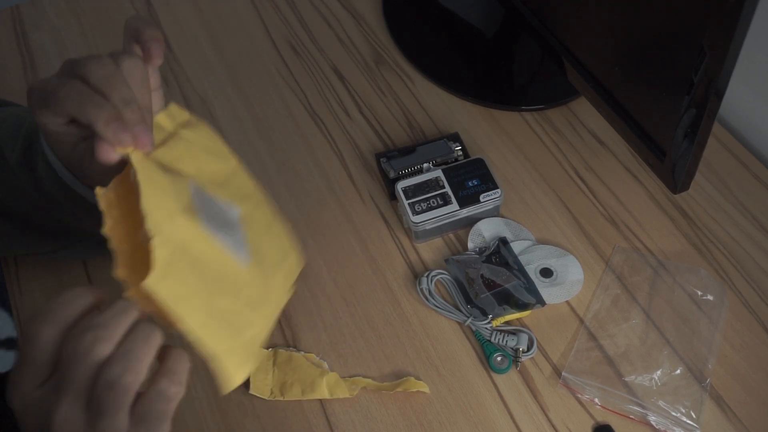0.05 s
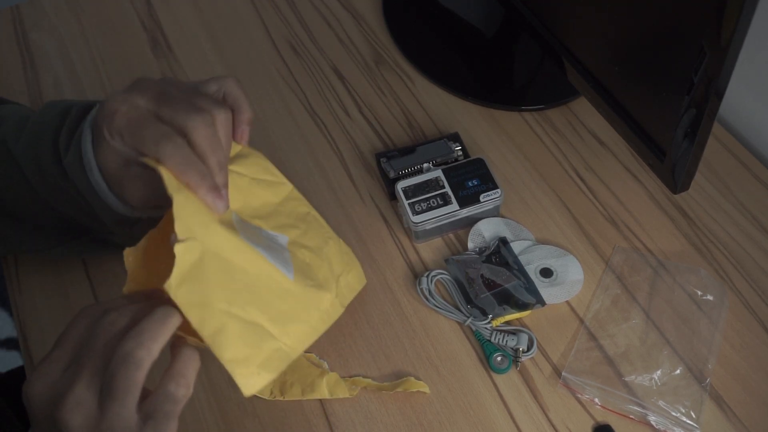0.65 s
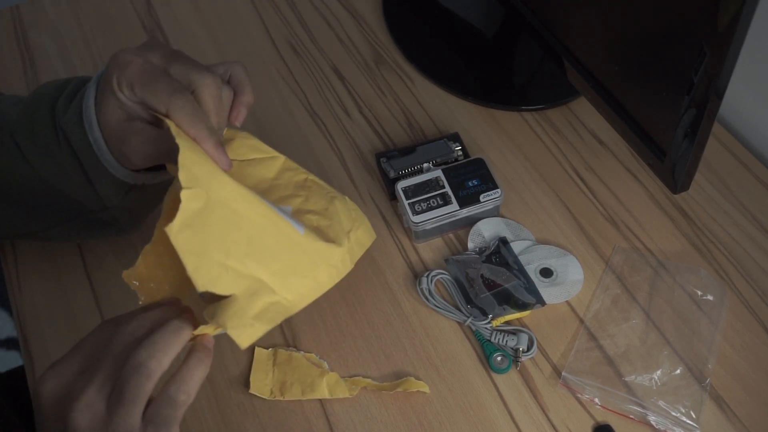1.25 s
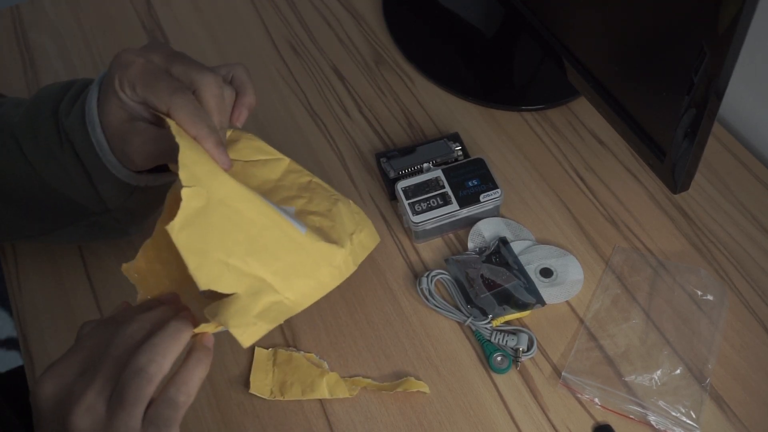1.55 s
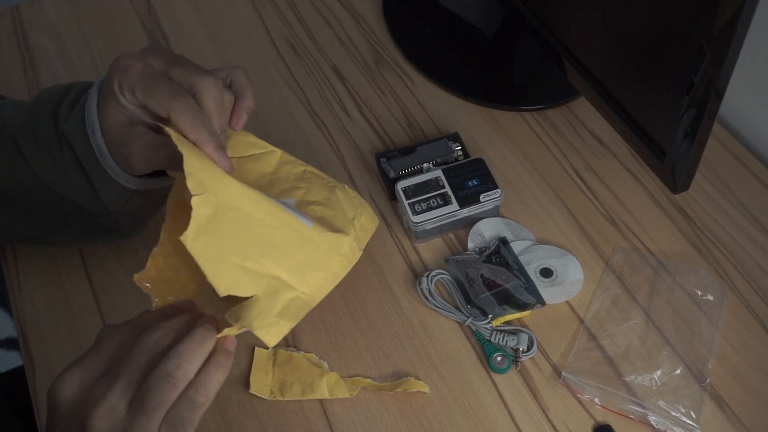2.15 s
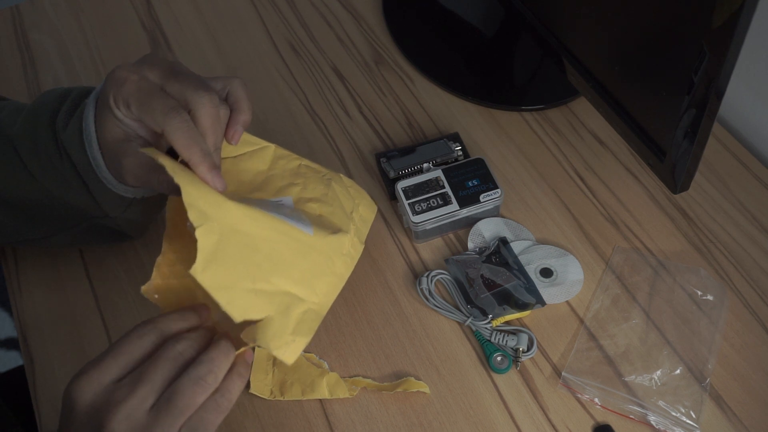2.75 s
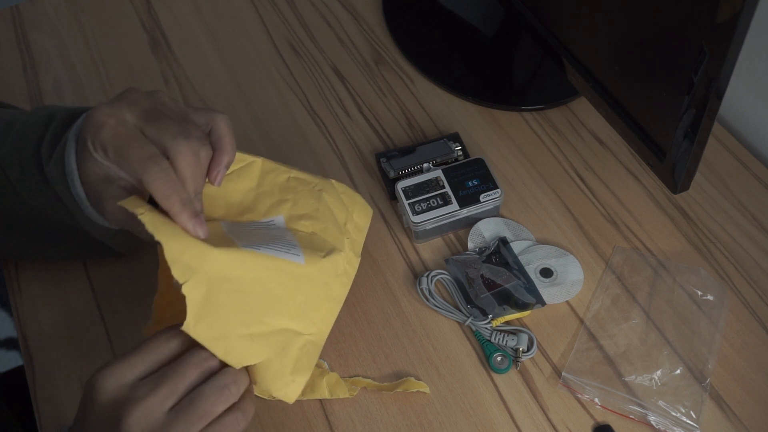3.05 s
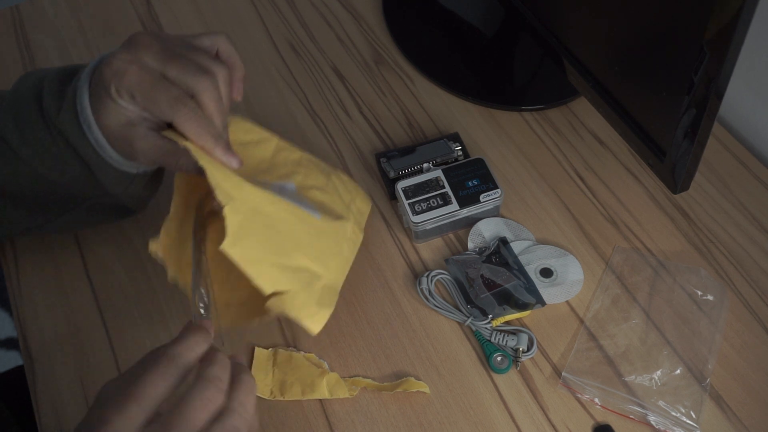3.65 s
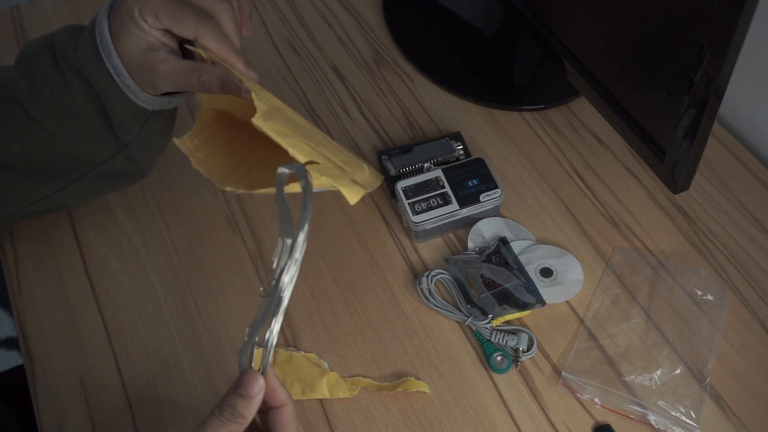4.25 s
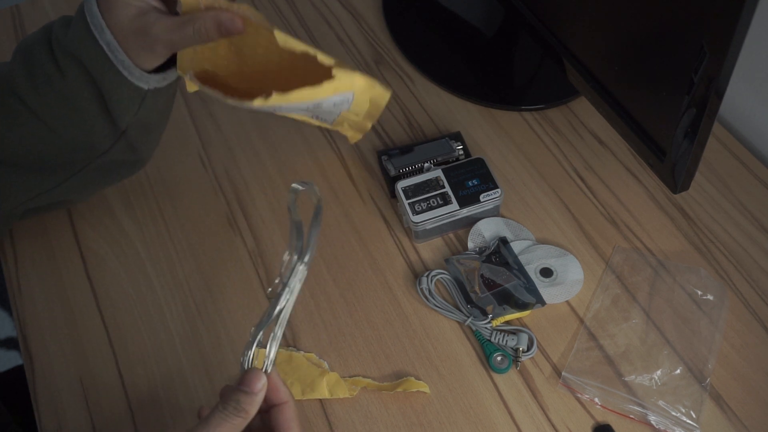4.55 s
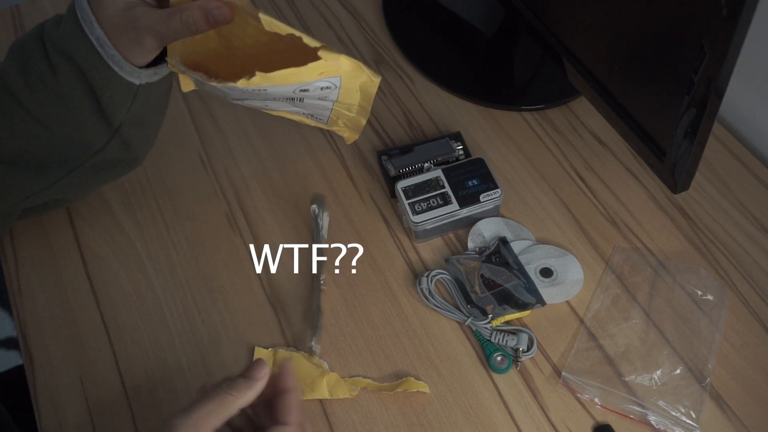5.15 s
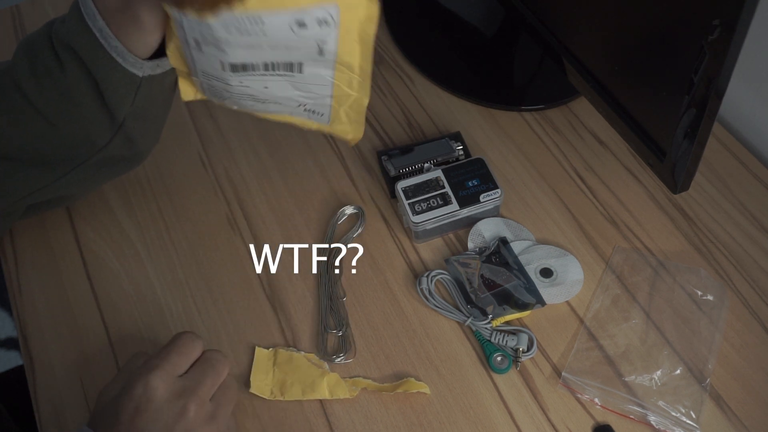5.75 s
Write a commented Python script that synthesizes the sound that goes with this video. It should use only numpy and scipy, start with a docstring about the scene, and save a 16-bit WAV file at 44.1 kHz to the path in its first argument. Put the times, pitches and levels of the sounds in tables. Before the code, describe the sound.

A padded paper mailer crinkles and rips open, then a cable slides out and clatters onto a wooden desk.

```python
"""First you hear paper rubbing and crinkling as hands grip a padded mailer, then a loud rip.
The paper catches and slips in tiny clicks, its creases buckle, and its fibres snap as it tears.
Hands bump the wooden desk, a coiled cable slides out and is dropped with a clatter of plugs,
and the mailer is turned over. A bare room adds a short echo and a faint hiss."""
import sys
import numpy as np
from scipy import signal
from scipy.fft import rfft, irfft
from scipy.io import wavfile
from scipy.ndimage import uniform_filter1d

SR = 44100
rng = np.random.default_rng(int(sys.argv[2]) if len(sys.argv) > 2 else 0)


def store_pcm(level_fs):
    """Save levels as 16-bit WAV."""
    pcm = np.round(np.clip(level_fs, -1, 1) * 32767).astype(np.int16)
    wavfile.write(sys.argv[1], SR, np.atleast_2d(pcm).T)


N = 260631

# Finger rubs. Each row: start and length in seconds, body (middle pitches) and fizz (treble) in dB,
# pitch of the mailer's hollow in Hz, its ring in dB. Levels in all tables are relative.
RUBS = [(0.0, 0.098, -43, -50.5, 1560, 0), (.13, .07, -52, -42, 1650, 3),
        (0.21, 0.047, -44.5, -41.5, 1790, 8.5), (.38, .035, -40, -38.5, 1700, 9),
        (.44, .06, -43, -42.5, 1810, 2), (0.54, .29, -42, -40, 1500, -3.5),
        (1.122, 0.11, -43, -45.5, 1220, 4), (1.35, .1, -83, -57.5, 1260, 4),
        (2.721, 0.12, -56.5, -57, 1050, 9.5), (2.914, .03, -52.5, -58, 1180, 6),
        (2.976, .02, -47.5, -41.5, 800, 11), (3.04, .05, -52.5, -49, 1850, -6.5),
        (3.17, .24, -53, -52.5, 1400, -24), (4.225, .03, -65, -60.5, 1410, -3),
        (4.35, .04, -56, -50, 1430, 4.5), (4.52, .1, -64.5, -62, 1800, 9.5),
        (5.771, 0.072, -54.5, -44, 1850, 6.5), (5.885, .04, -44, -38, 1730, 0.5)]
# The cable dragged out through the torn end. Each row: time in seconds, body in dB, fizz in dB.
SLIDE = [(3.42, -51, -43), (3.439, -34.5, -37), (3.48, -49, -41), (3.56, -44.5, -42.5), (3.63, -39, -38.5),
         (3.72, -45.5, -46), (3.78, -43, -54.5), (3.981, -56, -51)]
# Big creases buckling. Each row: start in seconds, level in dB, brightness in dB per octave,
# pitch in Hz of the paper panel that flips.
CRINKLES = [(0.1368, -38, -9, 3770), (0.2172, -31, -3, 1630), (0.2244, -30.5, -2.5, 1640),
            (0.3784, -32, 5, 1490), (0.458, -33, 0.5, 1780), (0.5508, -35.5, -8, 3460),
            (0.6038, -31.5, 3.5, 1630), (0.6476, -33, 20, 7040), (0.7172, -37, 1, 1320),
            (1.0996, -34, 6, 1540), (1.2185, -26.5, 5, 1200), (1.2542, -35.5, 4.5, 1160),
            (1.4272, -48, 9, 6160), (1.5396, -52, 5, 2830), (2.3966, -52, 2, 3330),
            (2.6194, -51.5, 4.5, 5050), (2.6636, -41.5, 0.5, 1390), (2.739, -45, 0.5, 1160),
            (2.8288, -47, 14, 4580), (2.8582, -47, 9, 6190), (2.9694, -35.5, -0.5, 1900),
            (3.0528, -44, 15, 6700), (3.2064, -46.5, 3, 4570), (3.433, -31.5, -2, 4200),
            (3.5754, -26.5, -2.5, 1340), (3.6358, -30, 6, 1290), (3.6666, -32, 7.5, 2550),
            (3.7222, -31, 3, 1460), (4.371, -42, 3.5, 1470), (4.4414, -46, 1.5, 1600),
            (5.728, -35.5, 15, 6990), (5.848, -36, 1, 1740), (5.8924, -34, 0.5, 1780)]
# The long rip. Each row: time in seconds, body in dB, fizz in dB.
RIP = [(.82, -47, -38.5), (.845, -32, -27), (.88, -30, -31), (.92, -20, -25.5), (.955, -28, -43),
       (.98, -35, -40.5), (1.005, -25, -39), (1.03, -54, -42), (1.11, -58.5, -54)]
# Fibre bundles breaking. Each row: start in seconds, level in dB, brightness in dB per octave.
CRACKS = [(0.8535, -16, -7.5), (0.8696, -21, -0.5), (0.8768, -18, 4), (0.8787, -19.5, -9.5),
          (0.8918, -14.5, 2), (0.8965, -14, -1), (0.9091, -21, 8), (0.9291, -20, -2), (0.9331, -20, 0),
          (0.9434, -25, 7), (0.952, -19, -1)]
# Cable and plugs hitting the desk and each other.
# Each row: start in seconds, level in dB, brightness in dB per octave.
CLACKS = [(4.065, -54, -1), (5.0142, -23.5, 0), (5.0955, -33, 2), (5.1035, -24.5, 2), (5.2245, -30.5, 1),
          (5.2575, -21.5, 3.5), (5.2675, -23, 5), (5.272, -16.5, 3), (5.3091, -26, -1),
          (5.3281, -25.5, 2.5)]
# How the plugs ring. Each row: pitch in Hz, width in Hz, level in dB.
PLUG_TONES = [(1210, 120, 0), (2070, 56, -9), (3310, 270, 6), (3950, 280, 9), (4440, 250, 6.5),
              (6160, 350, 0), (15300, 990, -2.5)]
# Soft blows on the desk. Each row: start in seconds, level in dB, contact time in seconds.
BUMPS = [(1.81, -41, 0.0059), (1.955, -40.5, 0.0069), (3.773, -29.5, 0.004), (3.784, -23, 0.0027),
         (3.801, -36, 0.0025), (3.839, -42, 0.0019), (5.0143, -51, 0.0012), (5.1841, -24.5, 0.00023),
         (5.222, -30.5, 0.0018), (5.271, -30.5, 0.003), (5.448, -30, 0.0062), (5.467, -44, 0.0043)]
# How the desk rings. Each row: pitch in Hz, level in dB, seconds to fade by 60 dB.
DESK_TONES = [(107, -15, 0.033), (130, -1, 0.14), (160, -7, 0.14), (180.7, -2, 0.14), (228, -8, 0.1),
              (281, 0.5, 0.06), (364, 3, 0.059), (457, -7, 0.14), (660, -13.5, 0.045)]
# Squeezes of the padding. Each row: start in seconds, length in seconds, level in dB.
SQUEEZES = [(0.346, 0.065, -56), (0.515, .14, -47.5), (0.667, 0.08, -43.5), (0.834, 0.16, -44.5),
            (1.328, .11, -49.5), (1.988, 0.15, -57), (2.707, 0.12, -51), (3.45, 0.45, -62)]
# The tone colour of each source. Each row: frequency in Hz, level in dB.
RUB_COLOUR = [(150, -23.5), (400, -12), (560, -7), (720, -4.5), (950, -7), (1400, 0), (2000, -1.5),
              (2500, -2.5), (3600, -0.5), (5200, -7.5), (6200, -5), (7200, -9), (12500, -2), (16000, -7)]
RIP_COLOUR = [(100, -30), (220, -18.5), (340, -24), (470, -12.5), (600, -15.5), (790, -7), (950, -10.5),
              (1400, -2), (1950, -6), (2480, -16), (3700, -12.5), (7000, -27.5), (12500, -22.5),
              (16000, -25.5)]
CABLE_COLOUR = [(200, 5), (450, 0.5), (900, -4), (1300, 0.5), (1650, 0), (2050, 2), (2500, -3),
                (3300, -1.5), (4300, -7), (5500, -7.5), (7500, -10.5), (12000, -5), (14700, 1.5),
                (16000, -8)]
PADDING_COLOUR = [(40, -16), (75, 1.5), (115, 3.5), (190, 3), (250, -7.5), (330, -4), (480, -12),
                  (800, -16.5), (2000, -68.5)]
HISS_COLOUR = [(12, -51), (20, -2.5), (81, -4.5), (110, -6.5), (472, -13.5), (642, -9.5), (738, -15),
               (897, -16), (1480, -17), (1760, -21), (3340, -22.5), (3630, -23.5), (3950, -22),
               (14700, -25.5), (16000, -29)]
# The room's echo. Each row: frequency in Hz, seconds to fade by 60 dB, level in dB.
ROOM_ECHO = [(100, 0.48, -2), (303, 0.54, 0.5), (800, 0.58, 2), (1560, 0.52, -0.5), (4000, 0.46, -1.5),
             (8600, 0.31, -0.5), (15000, .33, -11.5)]
# How wide echo and hiss sound. Each row: frequency in Hz, side against mid in dB (see widen).
ECHO_WIDTH = [(100, -37.5), (250, -18), (700, -7.5), (1300, -6), (2400, 0), (4400, 2), (8000, 4),
              (15000, 5)]
HISS_WIDTH = [(60, -14), (110, -9.5), (200, -1.5), (380, 2), (700, 2), (1290, 5), (2380, 3), (4400, 1),
              (8120, 0), (15000, 0.5)]

TIME = np.arange(N) / SR


def rubbing():
    """Sliding paper slips in tiny clicks that ring the mailer's hollow; creases buckle now and then."""
    strokes = [rub_levels(*row[:4]) for row in RUBS] + [SLIDE]
    hz, ring_db = hollow()
    clicks = slips(per_s=6000, spread_db=4)
    clicks = clicks + gain_of(ring_db) * resonate(clicks, hz, width_hz=320)
    slide = paper_stroke(clicks, strokes, RUB_COLOUR, patchy_db=3)
    buckles = CRINKLES + small_creases(strokes)
    creases = snaps(buckles, RUB_COLOUR, length_s=0.0036, spread_db=2, panel_db=17.5)
    return gain_of(-3.5) * slide + gain_of(-2.5) * creases


def rub_levels(start_s, length_s, body_db, fizz_db, swell_s=0.077, release_s=0.039):
    """One rub swells, sags a little and lets go. Gives rows like SLIDE."""
    end_s = start_s + length_s
    shape = [(start_s - swell_s, -20.5), (start_s, 0), (end_s, -0.5), (end_s + release_s, -20.5)]
    return [(s, body_db + db, fizz_db + db) for s, db in shape]


def hollow(slide_hz=1060, rise_hz_per_s=900, slide_ring_db=-3, wander_share=0.088, wander_s=0.05):
    """Each grip gives the mailer's hollow a new pitch and ring; the pitch rises as the cable leaves."""
    grips = [(start_s + length_s / 2, hz, ring_db) for start_s, length_s, _, _, hz, ring_db in RUBS]
    grips += [(s, slide_hz + rise_hz_per_s * (s - SLIDE[0][0]), slide_ring_db) for s, _, _ in SLIDE]
    s, hz, ring_db = np.transpose(sorted(grips))
    wander = np.interp(TIME / wander_s, np.arange(N), rng.uniform(-1, 1, N))  # the paper keeps flexing
    return np.interp(TIME, s, hz) * (1 + wander_share * wander), np.interp(TIME, s, ring_db)


def small_creases(strokes, held_s=5.6, per_s=20, still_db=-58.5, low_hz=1300, high_hz=6500):
    """Little creases tick at random in the gripped paper, louder during rubs. Gives CRINKLES rows."""
    when, size, panel = rng.random((round(held_s * per_s), 3)).T
    s = when * held_s
    fizz_db = level_curve(strokes, s, column=2)
    db = np.maximum(fizz_db + 1.5, still_db) + 4 * (2 * size - 1)
    brightness = np.full(len(s), 5)
    return list(zip(s, db, brightness, low_hz * (high_hz / low_hz) ** panel))


def ripping():
    """Fibres part in a coarse run, with loud cracks where whole bundles give way."""
    run = paper_stroke(slips(per_s=2200, spread_db=-1), [RIP], RIP_COLOUR, patchy_db=2)
    cracks = snaps(CRACKS, RIP_COLOUR, length_s=0.0041, spread_db=3)
    return gain_of(-3.5) * (run + cracks)


def slips(per_s, spread_db):
    """Surfaces catch and let go, making tiny clicks of random size at random times."""
    size = gain_of(spread_db * np.minimum(rng.exponential(1, N), 4))
    return unit_level(size * rng.choice([-1, 1], N) * (rng.random(N) < per_s / SR))


def paper_stroke(clicks, strokes, colour, patchy_db):
    """Clicks shake the sheet. Body and fizz follow the strokes; the tone shifts as the paper flexes."""
    hz, t, bands = signal.stft(unit_level(coloured(clicks, colour)), SR, nperseg=256)
    patches = uniform_filter1d(rng.standard_normal(bands.shape), size=6, axis=0)
    patches = uniform_filter1d(patches, size=8, axis=1)
    bands = bands * gain_of(patchy_db * unit_level(patches))
    power = (abs(bands) ** 2).mean(1)
    body, fizz = (hz > 800) & (hz < 2500), hz > 5000
    body_db = level_curve(strokes, t) - 10 * np.log10(power[body].sum() / power.sum())
    fizz_db = level_curve(strokes, t, column=2) - 10 * np.log10(power[fizz].sum() / power.sum())
    fizz_share = look_up([(2000, 0.18), (7000, 1.0)], hz)[:, None]
    bands = bands * gain_of((1 - fizz_share) * body_db + fizz_share * fizz_db)
    return signal.istft(bands, SR, nperseg=256)[1][:N]


def snaps(rows, colour, length_s, spread_db, panel_db=0, panel_sharpness=6.5):
    """Each snap is a burst of uneven clicks. If its row gives a pitch, a paper panel rings too."""
    out, t = np.zeros(N), TIME[:2048]
    for s, db, tilt_db, *panels in rows:
        clicks = rng.standard_normal(len(t)) * gain_of(spread_db * rng.standard_normal(len(t)))
        burst = coloured(clicks * np.exp(-(t / length_s) ** 2), colour, tilt_db)
        for hz in panels:
            burst = burst + gain_of(panel_db) * resonate(burst, hz, hz / panel_sharpness)
        burst *= np.sqrt(.005 * SR / np.sum(burst ** 2))  # as much energy as 5 ms at level 1
        add(out, s, gain_of(db) * burst)
    return out


def cable(rattle_s=0.021):
    """Hard clacks ring the plugs, and the loose coils rattle briefly after each one."""
    clacks = snaps(CLACKS, CABLE_COLOUR, length_s=0.0056, spread_db=2.5)
    clacks = clacks + sum(gain_of(db) * resonate(clacks, hz, width) for hz, width, db in PLUG_TONES)
    decay = np.exp(-1 / (rattle_s * SR))
    shake = np.sqrt(signal.lfilter([1 - decay], [1, -decay], clacks ** 2) + 1e-20)
    rattle = shake * unit_level(coloured(slips(per_s=1300, spread_db=-0.5), CABLE_COLOUR))
    return gain_of(-6.5) * clacks + gain_of(-11) * rattle


def desk(shove_s=0.0013):
    """A soft blow shoves the desk top and makes it ring; longer contact sounds duller."""
    out, t = np.zeros(N), TIME[:SR // 2]
    ring = sum(gain_of(db - 60 * t / fade) * np.sin(2 * np.pi * hz * t) for hz, db, fade in DESK_TONES)
    shove = (1 - t / shove_s) * np.exp(-t / shove_s)
    for s, db, contact_s in BUMPS:
        force = t * np.exp(-4 * t / contact_s)
        add(out, s, -gain_of(db) * signal.fftconvolve(force / force.sum(), .5 * ring + shove))
    return gain_of(1) * without_bass(out, hz=97)  # the board is too small to give off deep bass


def padding(swell_s=0.04, release_s=0.064):
    """The padding pops dully under the fingers, swelling with each squeeze."""
    squeezes = [[(s - swell_s, db - 17.5), (s, db), (s + hold_s, db), (s + hold_s + release_s, db - 17.5)]
                for s, hold_s, db in SQUEEZES]
    grip = [(1, -55), (3, -61)]  # from 1 to 3 seconds the grip creaks on and slowly relaxes
    pops = unit_level(coloured(slips(per_s=400, spread_db=2), PADDING_COLOUR))
    return gain_of(level_curve(squeezes + [grip], TIME) - 3.5) * pops


def nearby(x, bounce):
    """Sound arrives on the left just ahead of the right, and bounces off the desk and a screen."""
    paths_s = np.array([[0, .0021, .0052], [.000015, .00216, .00513]])
    delays = np.exp(-2j * np.pi * paths_s[..., None] * np.fft.rfftfreq(N, 1 / SR))
    return irfft(rfft(x) * (delays[:, 0] + bounce * delays[:, 1:].sum(1)), N)


def room(x, visit_s=.012, spots=4):
    """The sounding spot wanders over the sheet, so several echo patterns take turns."""
    place = (TIME / visit_s - np.arange(spots)[:, None]) % spots
    shares = np.sin(np.pi / 2 * np.minimum(place, 2))  # the total power stays the same
    return sum(echo(share * x) for share in shares)


def echo(x, rise_s=0.0025):
    """The room answers one spot with a dense echo that builds quickly and dies faster in the treble."""
    hz, t, bands = signal.stft(rng.standard_normal((2, SR)), SR, nperseg=256)
    shape = gain_of(-60 * t / look_up(ROOM_ECHO, hz)[:, None]) * (1 - np.exp(-(t / rise_s) ** 2))
    shape /= np.sqrt(SR * (shape ** 2).mean(1, keepdims=True))
    shape *= gain_of(look_up(ROOM_ECHO, hz, column=2))[:, None]
    mid, side = signal.istft(bands * shape, SR, nperseg=256)[1]
    return signal.fftconvolve(x[None], widen(mid, side, ECHO_WIDTH), axes=1)[:, :N]


def room_hiss():
    """Steady air noise and faint hiss."""
    colour = gain_of(look_up(HISS_COLOUR, np.fft.rfftfreq(N, 1 / SR)))
    mid, side = irfft(rfft(rng.standard_normal((2, N))) * colour, N)
    return gain_of(-61) * widen(unit_level(mid), unit_level(side), HISS_WIDTH)


def widen(mid, side, width):
    """Left and right share mid; side sets them apart, least of all in the bass."""
    side = irfft(rfft(side) * gain_of(look_up(width, np.fft.rfftfreq(len(side), 1 / SR))), len(side))
    return np.array([mid + side, mid - side])


def resonate(x, hz, width_hz):
    """Makes a sound ring at a steady or moving pitch; a narrower width rings longer."""
    turn = np.exp(2j * np.pi * np.cumsum(hz * np.ones(len(x))) / SR)
    decay = np.exp(-np.pi * width_hz / SR)
    return 2 * (turn * signal.lfilter([1 - decay], [1, -decay], x / turn + 1e-18)).real


def coloured(x, colour, tilt_db=0):
    """Gives a sound a tone colour, made brighter by tilt_db per octave."""
    hz = np.fft.rfftfreq(2048, 1 / SR)
    log_gain = np.log(gain_of(look_up(colour, hz) + tilt_db * np.log2(np.clip(hz, 900, 12000))))
    mirrored = np.r_[log_gain, log_gain[-2:0:-1]]
    taps = np.fft.ifft(np.exp(np.conj(signal.hilbert(mirrored)))).real  # rings only after each click
    return signal.oaconvolve(x, taps)[:len(x)]


def without_bass(x, hz):
    """Cuts away the sound below hz."""
    return signal.sosfilt(signal.butter(4, hz, "high", fs=SR, output="sos"), x)


def level_curve(stretches, t, column=1, fade_db_per_s=1500):
    """The level in dB of the loudest stretch at each time; each fades fast beyond its ends."""
    curves = [np.transpose(rows) for rows in stretches]
    return np.max([np.interp(t, c[0], c[column]) - fade_db_per_s * abs(t - np.clip(t, c[0][0], c[0][-1]))
                   for c in curves], axis=0)


def look_up(table, hz, column=1):
    """Reads a table at any frequency, gliding between its rows."""
    columns = np.transpose(table)
    return np.interp(np.log(hz + 1), np.log(columns[0] + 1), columns[column])


def gain_of(db):
    """Turns decibels into a number to multiply by."""
    return 10 ** (np.asarray(db) / 20)


def unit_level(x):
    """Scales a signal to an average power of 1."""
    return x / np.sqrt(np.mean(x ** 2) + 1e-20)


def add(mix, s, sound):
    """Mixes a sound in at s seconds."""
    part = mix[max(round(s * SR), 0):][:len(sound)]
    part += sound[:len(part)]


def scene():
    """Paper, cable, desk and padding up close, with the room's echo and hiss behind them."""
    paper = without_bass(rubbing() + ripping(), hz=110.3)
    clatter = without_bass(cable(), hz=132)
    thuds = desk() + padding()
    lean_right = gain_of([[-1], [1]])
    near = nearby(paper, bounce=0.033) + nearby(clatter, bounce=0.2) * lean_right + thuds
    echoes = room(paper + clatter) + echo(thuds)
    return near + gain_of(-0.5) * echoes + room_hiss()


def record(dry):
    """Cuts away the highest treble, above 16250 Hz."""
    return signal.oaconvolve(dry, signal.firwin(511, 16250, window=("kaiser", 9), fs=SR)[None], "same")


dry = scene()
out = record(dry)
store_pcm(out)
```